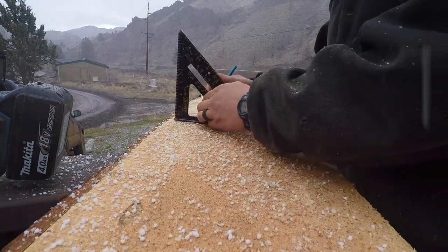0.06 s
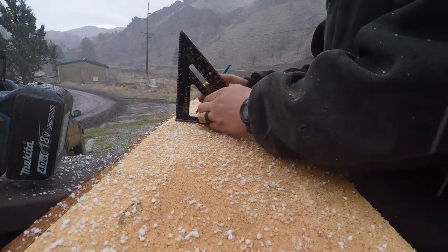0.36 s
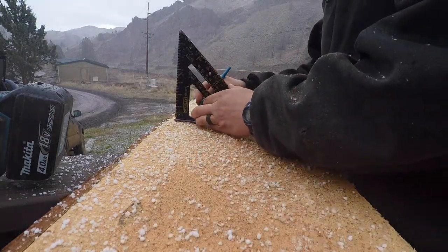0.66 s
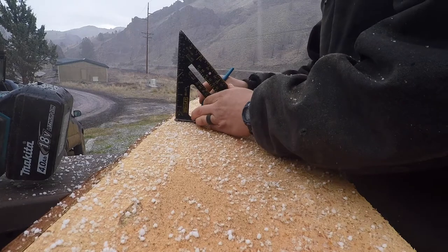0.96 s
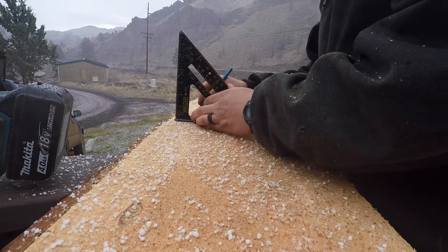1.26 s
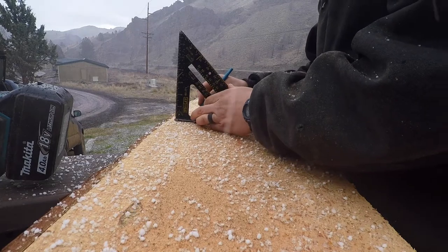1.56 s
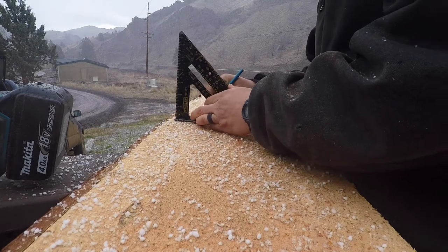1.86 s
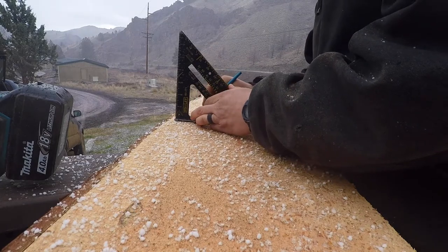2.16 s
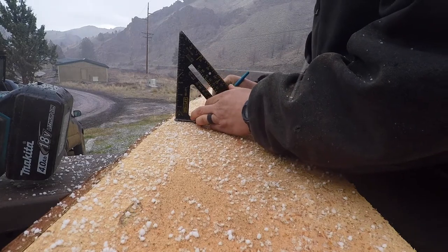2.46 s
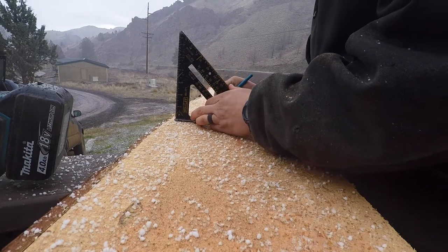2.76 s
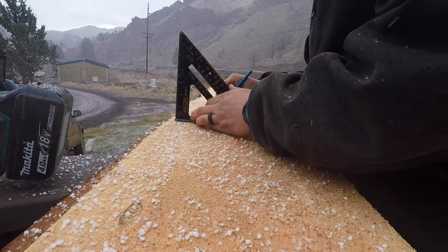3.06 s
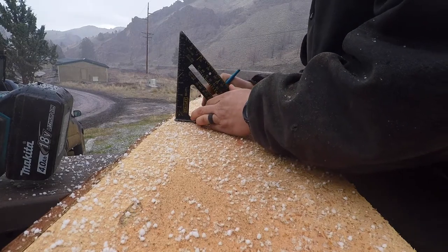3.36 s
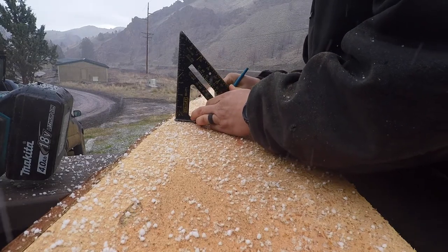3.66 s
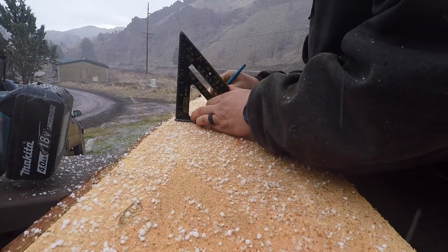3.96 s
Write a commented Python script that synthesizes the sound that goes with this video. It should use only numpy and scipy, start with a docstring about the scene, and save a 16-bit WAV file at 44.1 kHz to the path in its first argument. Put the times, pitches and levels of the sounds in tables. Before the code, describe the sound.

Sparse, sharp clicks of hail hitting wood and nearby gear outdoors, with wind rumbling underneath.

```python
"""Sharp, separate clicks: small hail strikes a wooden beam and the gear around it, outdoors.
Each impact is an impulse that excites damped modes, so a click takes the colour of the spot struck;
some blows also set a hard shell ringing briefly. Turbulent gusts rumble on the microphone,
and behind it all countless distant impacts add up to a faint hiss."""
import sys
import numpy as np
from scipy import signal
from scipy.io import wavfile

SR = 44100
rng = np.random.default_rng(int(sys.argv[2]) if len(sys.argv) > 2 else 0)


def store_pcm(level_fs):
    """Save levels as 16-bit WAV."""
    pcm = np.round(np.clip(level_fs, -1, 1) * 32767).astype(np.int16)
    wavfile.write(sys.argv[1], SR, np.atleast_2d(pcm).T)


N = 176400

# Edges of the six bands of a close impact: (frequency [Hz])
HIT_EDGES = [190, 900, 1700, 3200, 6000, 10000, 16000]
# Close impacts: (time [s], spot frequency [Hz], decay time T60 [s], spot gain [dB],
# low shell gain [dB], high shell gain [dB], six band levels [dB]); None: the shell stays silent
HITS = [(0.1068, 2090, 0.019, 4, -1, -11, -47, -39.5, -31, -35, -49, -62),
        (0.4205, 2530, 0.019, -5, None, None, -59, -54, -52.7, -59, -76, -75),
        (0.4631, 1064, 0.027, 0, None, None, -47, -41.5, -50, -51, -62.5, -69),
        (1.1249, 2450, 0.012, 14, 0, -6, -59, -39.5, -23.5, -36.5, -67, -47),
        (1.1674, 2510, 0.042, -4, None, None, -59, -49.5, -48.5, -56.5, -74.2, -81),
        (1.351, 3800, 0.036, -7, None, None, -65, -64, -64, -53.5, -67, -68),
        (1.6383, 2705, 0.037, 8, None, None, -62, -66, -49.5, -49.5, -58.5, -80),
        (1.9388, 2470, 0.01, 7, 3, -6, -55.5, -44.5, -40.5, -42.5, -46.5, -43),
        (1.9744, 6800, 0.014, -3, None, None, -77, -70, -46.5, -44, -46.5, -67),
        (1.9995, 3170, 0.013, 0, None, None, -80, -60, -51.5, -53.4, -51.5, -52),
        (2.1424, 4650, 0.021, -1, None, None, -74, -85, -76, -53, -58, -56.5),
        (2.5705, 1415, 0.019, 0, None, None, -51.5, -41, -50, -53.5, -53, -61),
        (2.7351, 2830, 0.022, 3, None, None, -58, -53, -50, -54.5, -63, -76),
        (2.7623, 2550, 0.016, -9, None, None, -49, -43, -39.5, -47.5, -66, -77),
        (2.8093, 1980, 0.025, -8, -8, 10, -51, -40.5, -39, -48.5, -52, -58),
        (2.8744, 1320, 0.019, 0, -7, -15, -42.5, -35.5, -34.5, -40, -43, -45.5),
        (2.9834, 4230, 0.011, -2, 2.5, 1.5, -53.5, -41, -31.5, -33, -45, -50.5),
        (3.626, 1185, 0.024, -2, None, None, -49.5, -41, -42.5, -49, -65, -69),
        (3.7683, 1313, 0.013, -7.5, 12, 9.5, -47, -26, -32.5, -42, -60, -55.5),
        (3.9583, 4550, 0.015, -5, -7, 9, -61, -50.5, -46.5, -42, -47.5, -45)]
def close_pellets():
    """Impact excitation: each nearby pellet makes a click, and some also drive the shell's modes."""
    out = np.zeros(N)
    for time, hz, t60, spot_db, low_db, high_db, *levels_db in HITS:
        add(out, time, from_db(-0.14) * impact(hz, t60, HIT_EDGES, levels_db, spot_db))
        if low_db is not None:
            add(out, time, shell_ring(levels_db, low_db, high_db))
    return out


HIT_LENGTH_S, TAIL_T60_S, DAMPED_ABOVE_HZ = 0.12, 0.033, 3370
# Broad body resonances common to all impacts: (frequency [Hz], bandwidth [Hz], gain [dB])
BODY_MODES = [(283, 280, -6), (780, 420, -1), (1230, 270, 2), (2430, 600, 1.5), (3200, 1060, 0),
              (4070, 1500, 0), (5740, 200, -10.5), (7000, 410, -16), (11060, 1660, -10),
              (12900, 1950, -12.5)]
def impact(hz, t60, edges, levels_db, spot_db=0):
    """Modal superposition: a blow excites the body's resonances and two modes of the struck spot."""
    t = np.arange(int(HIT_LENGTH_S * SR)) / SR
    crack = t == 0
    scatter = from_db(-9.5) * rng.standard_normal(len(t))  # the body's dense modes
    tail = from_db(-25) * decay(t, TAIL_T60_S)  # scattering from things nearby
    modes = np.sin(2 * np.pi * hz * t) + from_db(-12.5) * np.sin(2 * np.pi * 1.24 * hz * t)
    spot = from_db(spot_db - 2) * rms_one(modes * decay(t, t60))
    out = 0
    for low, high, db in zip(edges, edges[1:], levels_db):
        damping = max(1, np.sqrt(low * high) / DAMPED_ABOVE_HZ)  # treble dies sooner
        blow = crack + scatter * (decay(t, t60 / damping) + tail)
        body = sum((-1) ** k * from_db(gain_db) * resonate(blow, mode_hz, width)
                   for k, (mode_hz, width, gain_db) in enumerate(BODY_MODES))
        out = out + from_db(db) * rms_one(band(rms_one(body) + spot, low, high))
    return out * np.sqrt(0.01 / HIT_LENGTH_S)  # each band holds the energy of 10 ms at its level


# Modes of the hard shell: (frequency [Hz], gain [dB], decay time T60 [s])
SHELL_MODES = [(1966, -16, 0.058), (2244, -8.5, 0.056), (4430, -14.5, 0.075)]
def shell_ring(levels_db, low_db, high_db):
    """Free vibration: each mode rings as strongly as the blow drives its band; the low pair beats."""
    t = np.arange(int(HIT_LENGTH_S * SR)) / SR
    out = 0
    for (hz, db, t60), ring_db in zip(SHELL_MODES, (low_db, low_db, high_db)):
        drive_db = levels_db[np.searchsorted(HIT_EDGES, hz) - 1]
        out = out + from_db(drive_db + ring_db + db) * decay(t, t60) * np.sin(2 * np.pi * hz * t)
    return out


TICK_T60_S, STRAYS_PER_S = 0.026, 45
# Edges of the three bands of a light impact: (frequency [Hz])
TICK_EDGES = [700, 2500, 6500, 14500]
# Light impacts and rebounds: (time [s], spot frequency [Hz], three relative band levels [dB])
TICKS = [(0.379, 5200, -69, -65.5, -73), (0.395, 3180, -78, -70, -70.5), (0.427, 2530, -65, -60, -73),
         (0.503, 1100, -68, -76, -80), (0.778, 2280, -69, -67, -80), (0.937, 5820, -78, -62.5, -69),
         (0.981, 4400, -79, -63.5, -68), (1.001, 1210, -60.5, -64, -70.5), (1.184, 1330, -60.5, -65, -80),
         (1.742, 3400, -80, -64.5, -69.5), (1.794, 840, -68, -64, -69), (1.844, 1370, -60, -69, -86),
         (1.984, 3380, -79, -59, -67), (2.154, 2500, -76, -58, -64), (2.206, 3320, -72, -61, -71.5),
         (2.309, 1860, -60, -64.5, -79), (2.705, 2760, -73, -64, -70), (2.911, 2670, -76, -61, -65),
         (2.92, 1030, -56.5, -64, -78), (3.015, 3220, -76, -60, -84), (3.031, 2820, -56, -60.5, -84),
         (3.055, 1040, -55, -60, -65), (3.271, 920, -58.5, -65, -86), (3.398, 4780, -81, -60, -63),
         (3.44, 4140, -72, -61, -64.5), (3.449, 2450, -63.5, -61, -68), (3.581, 5900, -68, -67.5, -64.5),
         (3.637, 4830, -66, -67, -67.5), (3.668, 5130, -70, -67, -69), (3.867, 4221, -69, -59.5, -75),
         (3.911, 2170, -57, -61, -66), (3.926, 4156.0, -66, -64, -76)]
def light_pellets():
    """Weak impulses excite the same body: small ticks and rebounds, and fainter strays at random."""
    out = np.zeros(N)
    for time, hz, *levels_db in TICKS:
        add(out, time, from_db(5) * impact(hz, TICK_T60_S, TICK_EDGES, levels_db))
    for when, pitch, *colour in rng.random((int(STRAYS_PER_S * N / SR), 5)):
        hz = 1200 + 3500 * pitch
        lift_db = -2.5 * np.log(np.maximum(colour, 0.05))
        levels_db = lift_db + [-70.5, -70.5, -79.5]  # duller in the top band
        add(out, when * N / SR, impact(hz, TICK_T60_S, TICK_EDGES, levels_db, spot_db=6))
    return out


# Gusts: (hold start [s], hold end [s], relative level [dB], thud level [dB])
GUSTS = [(1.689, 1.923, -52.5, -42.5), (2.404, 2.56, -47, -49), (2.795, 2.878, -47, -36.5),
         (3.031, 3.087, -45.5, -40.5), (3.26, 3.375, -42, -28), (3.617, 3.759, -42.5, -40.5)]
# Wind between gusts: (time [s], relative level [dB])
BREEZE = [(0, -68.5), (.3, -67), (1.57, -70.5), (1.66, -62), (2.2, -60.5), (4, -61.5)]
# Spectrum of the buffeting: (frequency [Hz], relative spectral density [dB])
BUFFET_SPECTRUM = [(30, -3.5), (55, 2.5), (80, 6), (110, -2), (150, 1), (200, -13), (300, -36),
                   (450, -28.5), (900, -31.5), (1300, -46), (1700, -42), (4000, -63)]
# Cavity resonances of the microphone port: (frequency [Hz], bandwidth [Hz], gain [dB])
PORT_MODES = [(241, 25.5, -16.5), (338.4, 28.4, -14), (566, 67, -16.5), (696, 96, -22), (857, 53, -22),
              (1194, 150, -21)]
def wind():
    """Turbulent pressure buffets the microphone, thuds, and excites the cavity modes of its port."""
    gust_power = sum((from_db(db) * swell(start, end)) ** 2 for start, end, db, _ in GUSTS)
    wind_db = 10 * np.log10(from_db(in_time(BREEZE)) ** 2 + gust_power)
    buffet = from_db(wind_db + 3) * banded_noise(BUFFET_SPECTRUM, flicker_db=2)
    hollows = sum(from_db(db) * rms_one(resonant_noise(N, hz, width, 2 * width))
                  for hz, width, db in PORT_MODES)
    port = hollows * from_db(wind_db + 2.5 * drift(70))
    thud_level = sum(from_db(db) * swell(start, end) for start, end, _, db in GUSTS)
    return buffet + port + thud_level * throb(hz=52, width_hz=20.8)


def swell(start, end, rise_s=0.025, fall_s=0.045):
    """Exponential growth and decay: a gust builds until start, holds, and dies away after end."""
    t = np.arange(N) / SR
    return np.exp(-np.maximum(start - t, 0) / rise_s - np.maximum(t - end, 0) / fall_s)


# Envelope of the deep rumble: (time [s], level [dB])
RUMBLE = [(0, -44.5), (.14, -35.5), (.26, -53.5), (.34, -41), (.4, -49.5), (.45, -41), (.66, -40),
          (.8, -50), (.88, -43), (1.22, -48.5), (1.3, -47.5), (1.58, -48.5), (1.68, -32.5), (1.9, -32.5),
          (2.14, -35.5), (2.2, -45.5), (2.25, -33.5), (2.48, -28.5), (2.76, -36.5), (2.85, -21),
          (2.92, -31.5), (3.22, -31), (3.39, -17), (3.62, -33.5), (4, -40.5)]
def wind_rumble():
    """Amplitude modulation: a deep, narrow band of wind noise swells and sinks."""
    flutter_db = 0.5 * drift(20)
    return from_db(in_time(RUMBLE) + 0.3 + flutter_db) * throb(hz=28.7, width_hz=6.4)


def throb(hz, width_hz):
    """Forced vibration: turbulence shakes a low resonance, held at a fairly even level; rms 1."""
    shaken = resonant_noise(N + SR, hz, width_hz, width_hz)
    analytic = signal.hilbert(shaken)[SR // 2:SR // 2 + N]
    envelope = np.abs(analytic)
    return rms_one(analytic.real / (envelope + 0.74 * envelope.mean()))


# Spectrum of the distant hail: (frequency [Hz], relative spectral density [dB])
HISS_SPECTRUM = [(100, -4), (200, -1), (400, -1.5), (900, -2), (1250, -4), (1900, -6.5), (2250, -3.5),
                 (2700, 2), (3300, -2), (4300, -6.5), (6500, -14), (10000, -16.5), (15000, -21),
                 (16500, -26)]
def far_hail():
    """Incoherent summation: countless distant impacts merge into a hiss."""
    return from_db(-62) * banded_noise(HISS_SPECTRUM, flicker_db=2)


def banded_noise(spectrum, flicker_db):
    """Spectral shaping: third-octave bands of noise, each flickering independently; rms 1."""
    edges = np.geomspace(25, 18000, 29)
    hz, db = np.transpose(spectrum)
    white = rng.standard_normal((2, N + SR // 2))
    out = 0
    for k, (low, high) in enumerate(zip(edges, edges[1:])):
        level_db = np.interp(np.log(low * high) / 2, np.log(hz), db)
        out = out + band(white[k % 2], low, high)[-N:] * from_db(level_db + flicker_db * drift(40))
    return rms_one(out)


def resonant_noise(samples, hz, first_width_hz, second_width_hz):
    """Random excitation of two resonators in series."""
    return resonate(resonate(rng.standard_normal(samples), hz, first_width_hz), hz, second_width_hz)


def resonate(x, hz, width_hz):
    """A damped second-order resonator with unit peak gain."""
    r = np.exp(-np.pi * width_hz / SR)
    feedback = [1, -2 * r * np.cos(2 * np.pi * hz / SR), r * r]
    return signal.lfilter(np.array([1, 0, -1]) * (1 - r * r) / 2, feedback, x)


def drift(rate_hz):
    """Random modulation: linear interpolation between draws of unit variance."""
    knots = rng.standard_normal(N // 20)
    return np.interp(np.arange(N) / SR * rate_hz, np.arange(len(knots)), knots)


def decay(t, t60):
    """Exponential damping: a fall of 60 dB in t60 seconds."""
    return from_db(-60 * t / t60)


def band(x, low, high):
    return signal.sosfilt(signal.butter(3, [low, high], "band", fs=SR, output="sos"), x)


def from_db(db):
    return 10 ** (np.asarray(db) / 20)


def rms_one(x):
    return x / np.sqrt(np.mean(x ** 2) + 1e-20)


def in_time(rows):
    return np.interp(np.arange(N) / SR, *np.transpose(rows))


def add(out, time, sound):
    start = int(np.clip(time * SR, 0, N - 1))
    out[start:start + len(sound)] += sound[:N - start]


def scene():
    """Linear superposition: hail and wind add in one channel."""
    return (far_hail() + wind() + wind_rumble() + close_pellets() + light_pellets())[None]


def record(dry):
    """Band limiting: a steep low-pass filter removes the highest treble."""
    return signal.sosfilt(signal.ellip(10, 0.1, 80, 15400, fs=SR, output="sos"), dry)


dry = scene()
out = record(dry)
store_pcm(out)
```